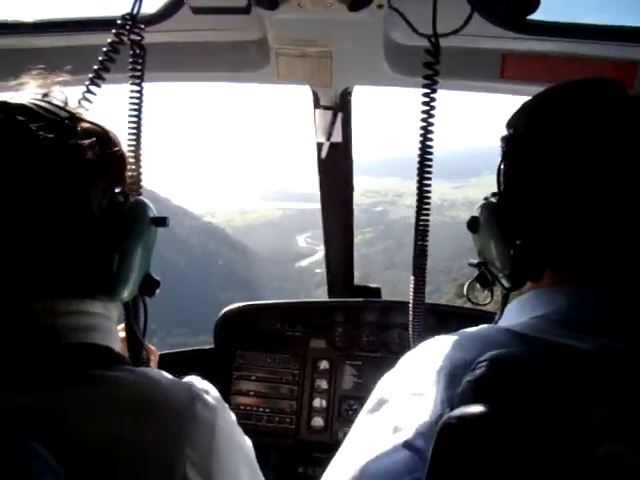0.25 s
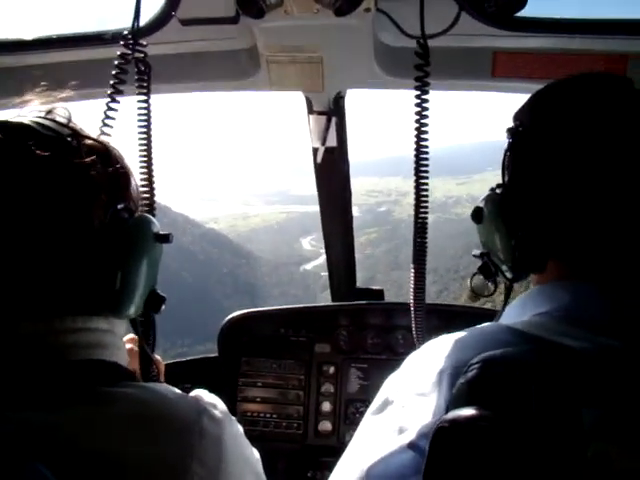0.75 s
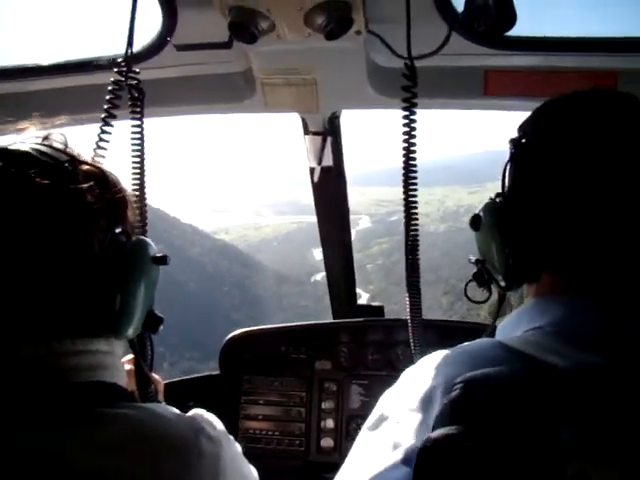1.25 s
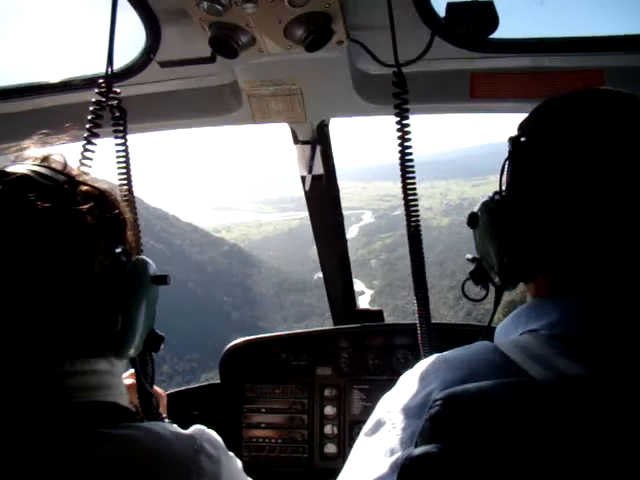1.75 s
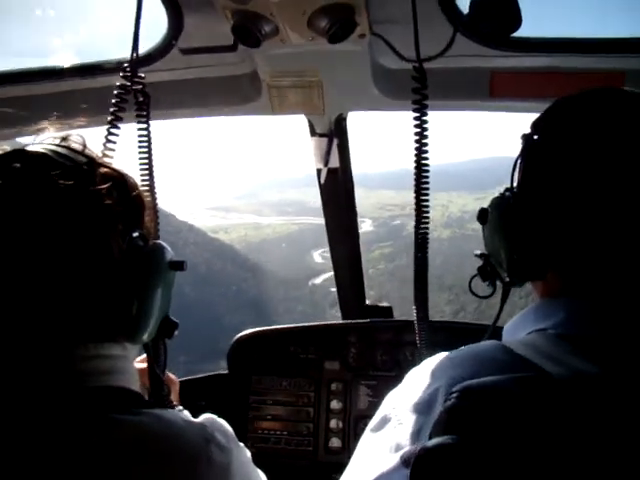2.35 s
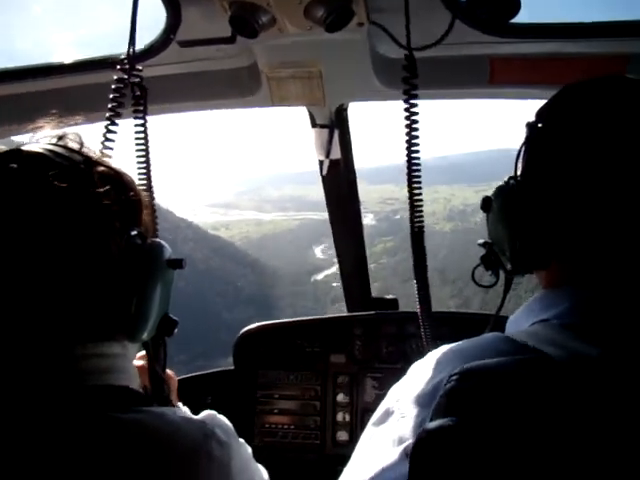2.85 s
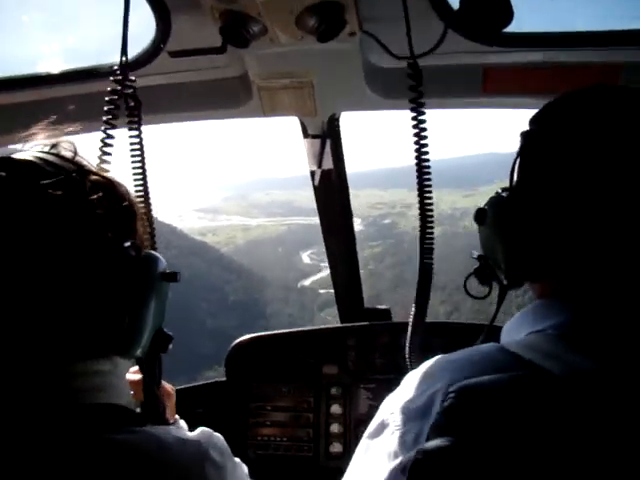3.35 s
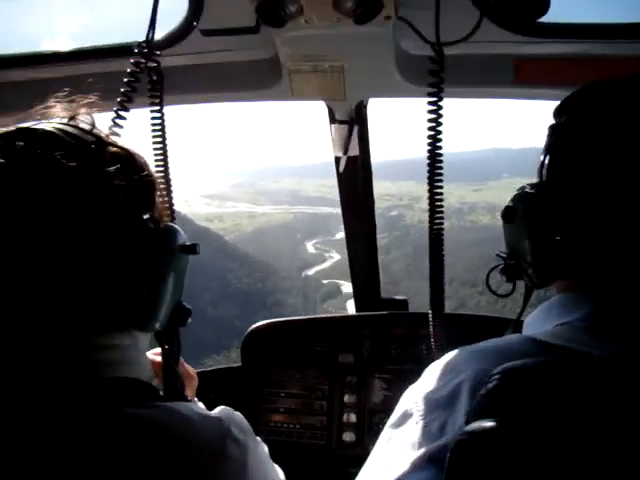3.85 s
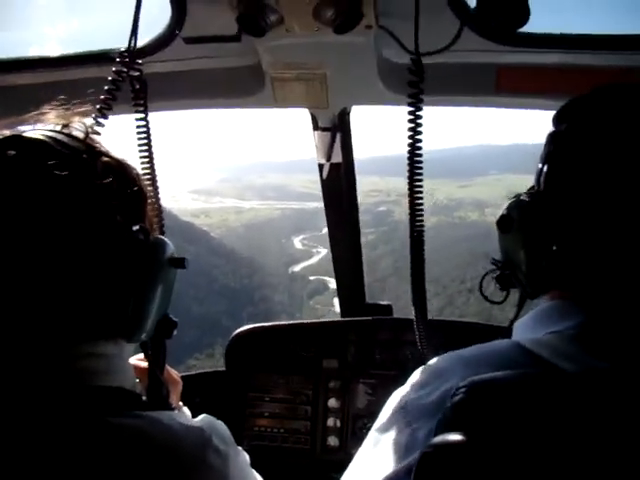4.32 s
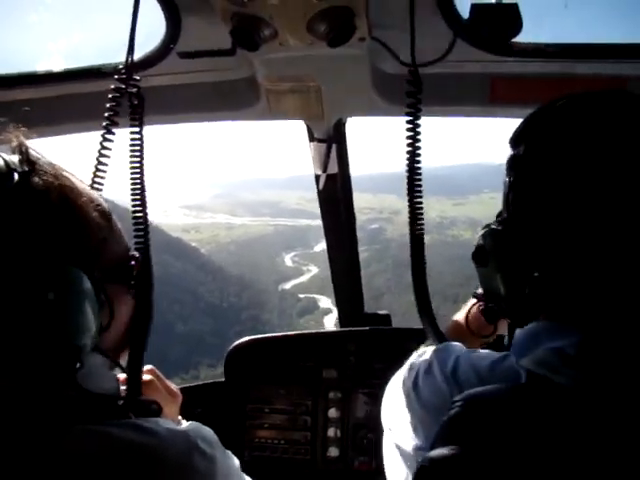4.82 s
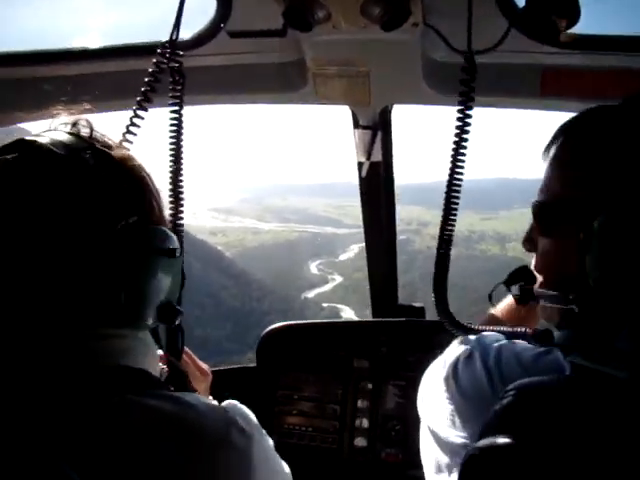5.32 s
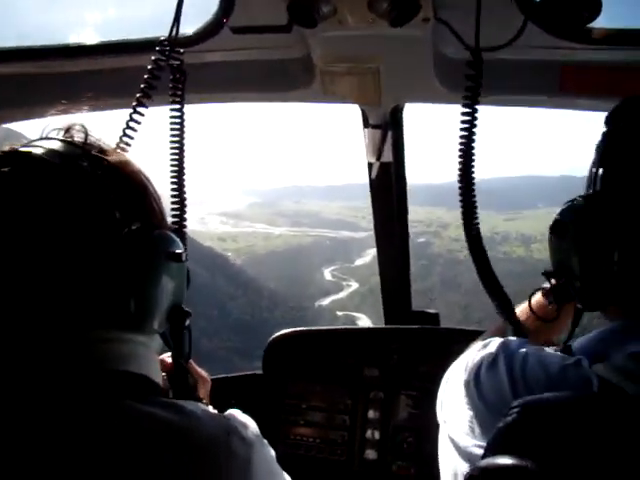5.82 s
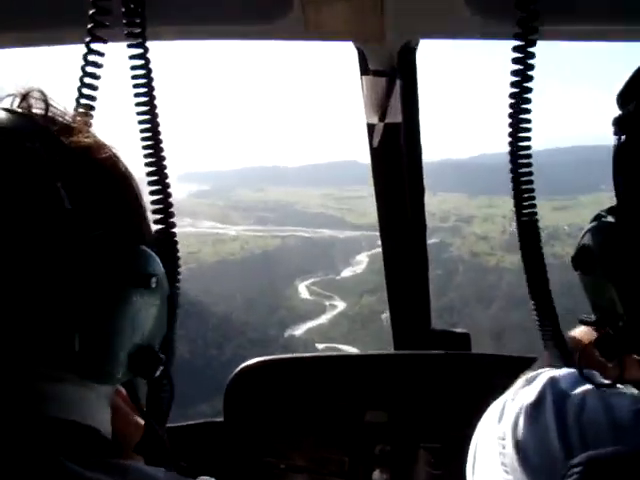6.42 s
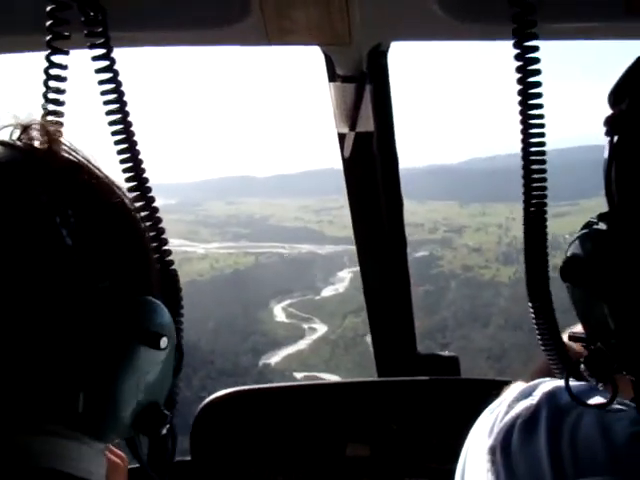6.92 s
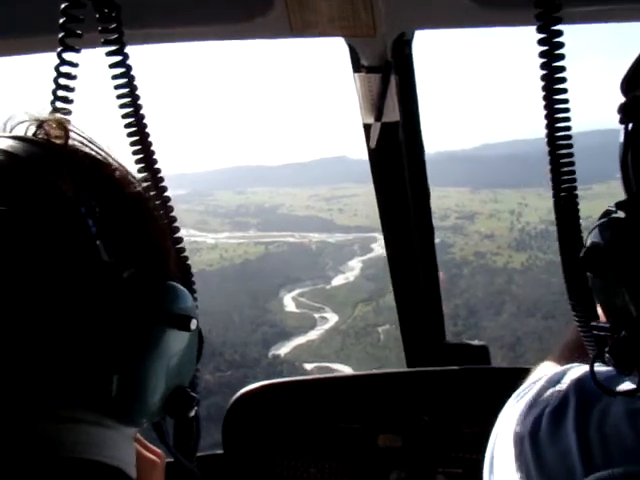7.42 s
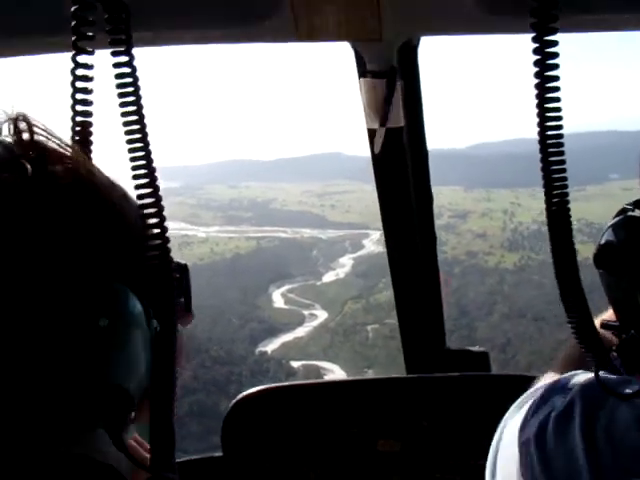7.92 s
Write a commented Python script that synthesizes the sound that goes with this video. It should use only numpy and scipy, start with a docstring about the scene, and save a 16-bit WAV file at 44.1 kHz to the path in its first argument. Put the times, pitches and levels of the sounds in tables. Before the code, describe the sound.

Steady rush of air and turbine noise inside a flying helicopter cabin, with several high gearbox whines held over it.

```python
"""Helicopter cabin in cruise

Turbulence from slipstream and turbine makes a broad rush and drives the cabin panels at resonance.
Passing blades modulate the cabin sound; the main and tail rotors throb low beneath it.
The gearbox whines on top. Rotor and gear pitches follow one shaft speed, which sags and recovers
slightly; when it is up, the input gear nears a resonance of the airframe and sings out."""
import sys
import numpy as np
from scipy import signal
from scipy.fft import rfft, irfft, next_fast_len
from scipy.io import wavfile

SR = 44100
rng = np.random.default_rng(int(sys.argv[2]) if len(sys.argv) > 2 else 0)


def to_wav(sig):
    """Store sig (one row per channel, or 1-D mono) as 16-bit WAV at the path in sys.argv[1].

    Samples outside -1..1 are clipped; the rate is SR.
    """
    pcm = np.clip(np.atleast_2d(sig), -1, 1) * 32767
    pcm = np.round(pcm).astype(np.int16)
    wavfile.write(sys.argv[1], SR, pcm.T)  # frames by channels


N = 360297

# Drive-train speed. Each row: time in seconds, tooth-mesh frequency of the planetary gears in Hz.
MESH_PITCH = [(0, 663), (.4, 663.6), (1.1, 662.5), (1.8, 657.6), (2.6, 657.6), (3.3, 659.8), (3.8, 662.9),
              (4.2, 662.3), (4.6, 659.7), (5.1, 657.9), (6, 657.4), (6.5, 659), (8.1, 657.3)]
# The loudest whine, an octave above the mesh tone. Each row: time in seconds, level in dB.
OCTAVE_LEVEL = [(0.0, -27.0), (0.35, -26.5), (0.8, -31), (1.05, -28), (2.7, -34), (2.95, -28), (3.3, -31.5),
                (3.8, -25.4), (4.5, -29), (6.6, -27), (7.3, -31.5), (8.17, -33.5)]
# Weaker mesh overtones. Each row: multiple of the mesh frequency, starting level in dB.
MESH_OVERTONES = [(3, -41.5), (4, -40.5), (5, -41), (6, -48.5)]
# Blade-rate harmonics of each rotor, from the first up. Each row: level in dB, flutter depth from 0 to 1.
MAIN_HARMONICS = [(-79, 0.03), (-66.5, 0.05), (-58, 0), (-58.5, 0.05), (-69, 0)]
TAIL_HARMONICS = [(-56.5, 0.02), (-49, 0.02), (-55.5, 0)]
# Slipstream and turbine noise. Each row: frequency in Hz, relative spectral density in dB.
RUSH_SPECTRUM = [(20, -36.5), (50, -31.5), (85, -23), (125, -14), (190, -13), (320, -8.5), (600, -2.5),
                 (1000, -.5), (1800, 0), (2500, -2.5), (3400, -3.5), (4500, -8), (6000, -13), (10000, -18)]
# Cabin panel resonances. Each row: centre in Hz, half-width in Hz, level in dB.
PANEL_MODES = [(234, 9.7, -51), (279, 14, -49), (372, 28, -42.5), (444, 30, -39), (764, 28, -42.5),
               (955, 47, -36.5)]

# gearing, in cycles per turn of the main rotor
MAIN_PASSES, TAIL_PASSES, MESH_TEETH, INPUT_TEETH = 3, 10.606, 100, 264.35
ROAR_DB, HISS_DB, HISS_FROM_HZ = -18.5, -26, 4980
WHIRR_HZ, WHIRR_HALF_WIDTH_HZ, WHIRR_DB, WHIRR_DB_PER_SAG_HZ = 890, 33, -31.5, 0.6
WHIRR_SURGE_DB, SURGE_RATE_HZ = .6, 2.5
AIRFRAME_HZ, AIRFRAME_HALF_WIDTH_HZ = 1757, 3.5
MESH_DB, INPUT_PEAK_DB, RISE_DB_PER_S = -34.5, -22.5, 0.34   # both levels before the slow rise


def from_db(db):
    """Amplitude ratio of a level in decibels."""
    return 10 ** (np.asarray(db) / 20)


def in_time(rows):
    """Linear interpolation of (seconds, value) rows at every sample."""
    seconds, values = np.transpose(rows)
    return np.interp(np.arange(N) / SR, seconds, values)


def at_hz(points, hz):
    """Gain of a spectrum table, interpolated on a log-frequency axis."""
    knots, db = np.transpose(points)
    return from_db(np.interp(np.log(hz), np.log(knots), db))


def shaped_noise(gain_at):
    """White noise filtered by a function of frequency and scaled to an rms of 1."""
    size = next_fast_len(N)
    hz = np.maximum(np.arange(size // 2 + 1) * SR / size, 1e-3)
    noise = irfft(rfft(rng.standard_normal(size)) * gain_at(hz), size)[:N]
    return noise / np.sqrt(np.mean(noise ** 2) + 1e-20)


def resonance(centre_hz, half_width_hz):
    """A damped resonator under random forcing responds with a narrow band of noise."""
    return shaped_noise(lambda hz: 1 / (1 + ((hz - centre_hz) / half_width_hz) ** 2))


def drift(rate_hz):
    """Random fluctuation of rms 1, mostly slower than the given rate."""
    return shaped_noise(lambda hz: 1 / (1 + (hz / rate_hz) ** 2))


def tone(cycles):
    """A sinusoid of rms 1 and random phase that follows a running count of cycles."""
    return np.sqrt(2) * np.sin(2 * np.pi * (cycles + rng.random()))


def rotor(passes, harmonics, gust_db):
    """Periodic pressure waves of passing blades form a harmonic series: a drone and a flutter."""
    drone, flutter = 0, 0
    for k, (level_db, depth) in enumerate(harmonics, 1):
        drone += from_db(level_db + gust_db * drift(3)) * tone(k * passes)
        flutter += depth * np.cos(2 * np.pi * k * passes)
    return drone, flutter


def panels(sag_hz):
    """Airflow excites the panel modes; the strongest, a rough whirr, swells as load slows the rotor."""
    hum = sum(from_db(level_db) * resonance(hz, half_width) for hz, half_width, level_db in PANEL_MODES)
    whirr_db = WHIRR_DB + WHIRR_DB_PER_SAG_HZ * sag_hz + WHIRR_SURGE_DB * drift(SURGE_RATE_HZ)
    return hum + from_db(whirr_db) * resonance(WHIRR_HZ, WHIRR_HALF_WIDTH_HZ)


def rush(flicker_db, hiss_flicker_db):
    """Turbulence on the hull is broadband: a roar passes through the walls, a hiss through the seals."""
    hiss_share = lambda hz: 1 / (1 + (HISS_FROM_HZ / hz) ** 12)
    roar = shaped_noise(lambda hz: at_hz(RUSH_SPECTRUM, hz) * np.sqrt(1 - hiss_share(hz)))
    hiss = shaped_noise(lambda hz: at_hz(RUSH_SPECTRUM, hz) * np.sqrt(hiss_share(hz)))
    eddies_db = flicker_db * drift(17)
    roar *= from_db(ROAR_DB + eddies_db)
    hiss *= from_db(HISS_DB + eddies_db + hiss_flicker_db * drift(82))
    return roar + hiss


def whine(cycles, turns, wobble, waver_db, jitter_cycles):
    """A gear tone is amplitude-modulated once per rotor turn and by the varying load on the teeth."""
    carrier = tone(cycles + jitter_cycles * drift(12))
    return carrier * (1 + wobble * tone(turns)) * from_db(waver_db * drift(10))


def gearbox(turns, mesh_hz):
    """Meshing planetary teeth give a harmonic series; the faster input gear swells near resonance."""
    mesh_cycles = MESH_TEETH * turns
    octave = whine(2 * mesh_cycles, turns, wobble=0.13, waver_db=0.7, jitter_cycles=0.013)
    fundamental = whine(mesh_cycles, turns, wobble=0.2, waver_db=1.0, jitter_cycles=0.018)
    input_gear = whine(INPUT_TEETH * turns, turns, wobble=0.056, waver_db=0.8, jitter_cycles=0.017)
    detuning = (mesh_hz * INPUT_TEETH / MESH_TEETH - AIRFRAME_HZ) / AIRFRAME_HALF_WIDTH_HZ
    lesser_tones = from_db(MESH_DB) * fundamental
    lesser_tones += from_db(INPUT_PEAK_DB) / np.hypot(1, detuning) * input_gear
    for multiple, level_db in MESH_OVERTONES:
        overtone = whine(multiple * mesh_cycles, turns, wobble=0.3, waver_db=1.7, jitter_cycles=0.04)
        lesser_tones += from_db(level_db) * overtone
    slow_rise = from_db(RISE_DB_PER_S * np.arange(N) / SR)
    return from_db(in_time(OCTAVE_LEVEL)) * octave + slow_rise * lesser_tones


def scene():
    """The sources superpose, and the blades of both rotors modulate the amplitude of the cabin sound."""
    mesh_hz = in_time(MESH_PITCH)
    turns = np.cumsum(mesh_hz) / MESH_TEETH / SR   # of the main rotor
    main_drone, main_flutter = rotor(MAIN_PASSES * turns, MAIN_HARMONICS, gust_db=0.0)
    tail_drone, tail_flutter = rotor(TAIL_PASSES * turns, TAIL_HARMONICS, gust_db=-0.8)
    air = rush(flicker_db=0.38, hiss_flicker_db=1.2)
    cabin = air + panels(sag_hz=mesh_hz.mean() - mesh_hz) + gearbox(turns, mesh_hz)
    mono = cabin * (1 + main_flutter + tail_flutter) + main_drone + tail_drone
    return np.array([mono, mono])


def record(dry):
    """Band limiting: a steep low-pass filter removes the highest treble."""
    cutoff_hz = 10050
    return signal.sosfilt(signal.ellip(12, .1, 85, cutoff_hz, fs=SR, output="sos"), dry)


dry = scene()
out = record(dry)
to_wav(out)
```